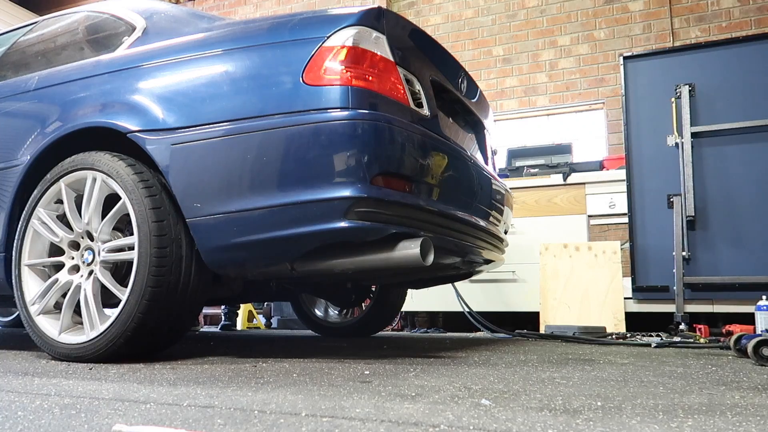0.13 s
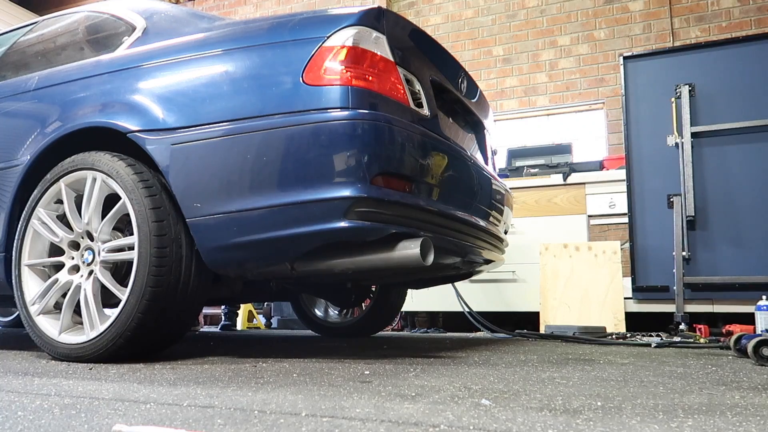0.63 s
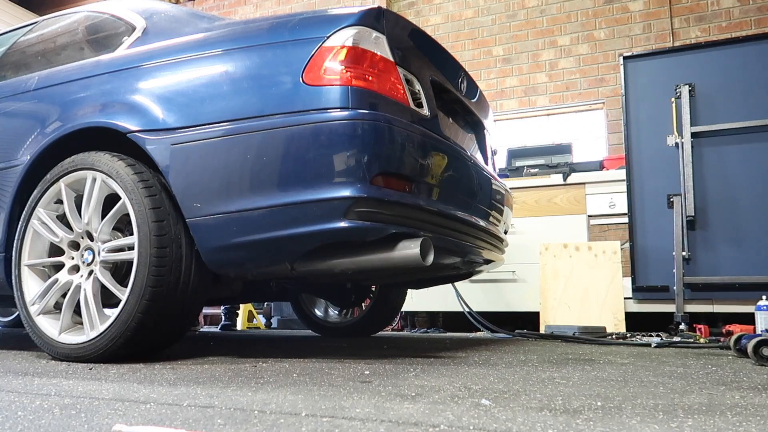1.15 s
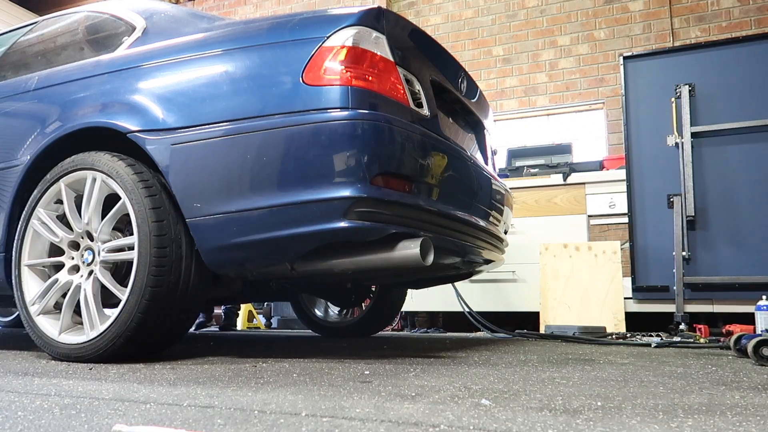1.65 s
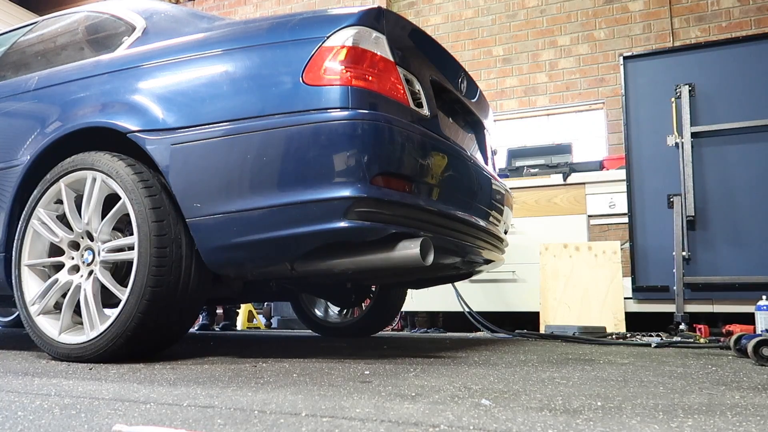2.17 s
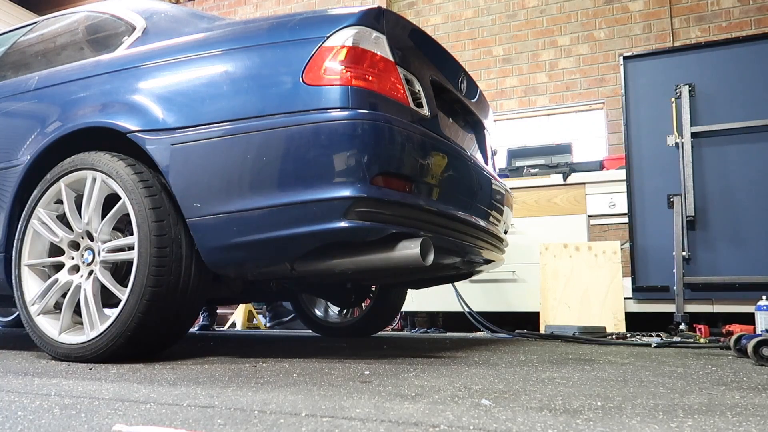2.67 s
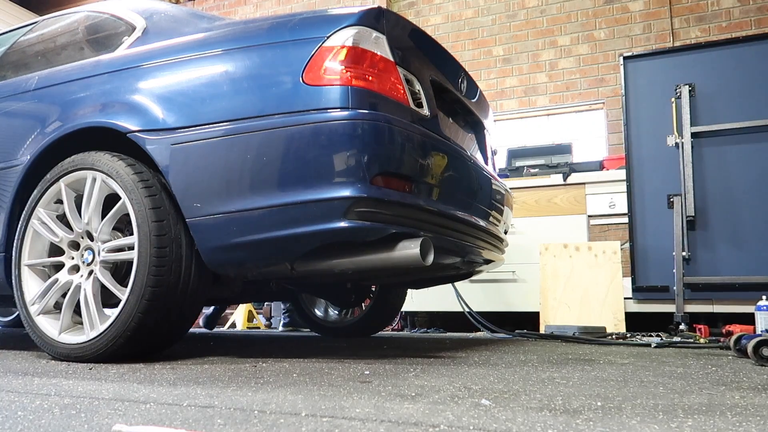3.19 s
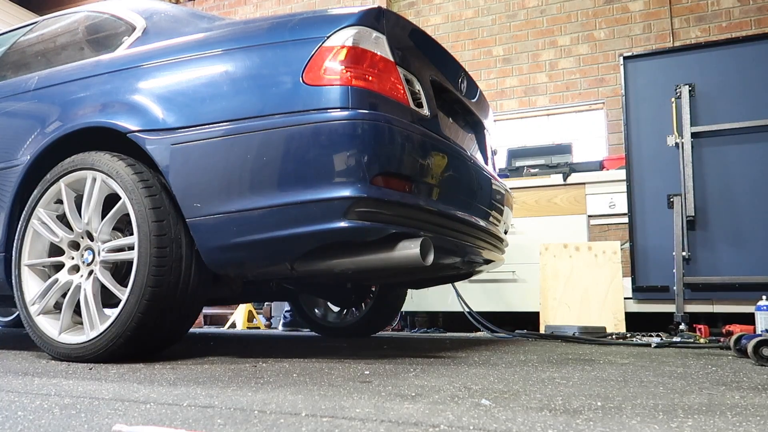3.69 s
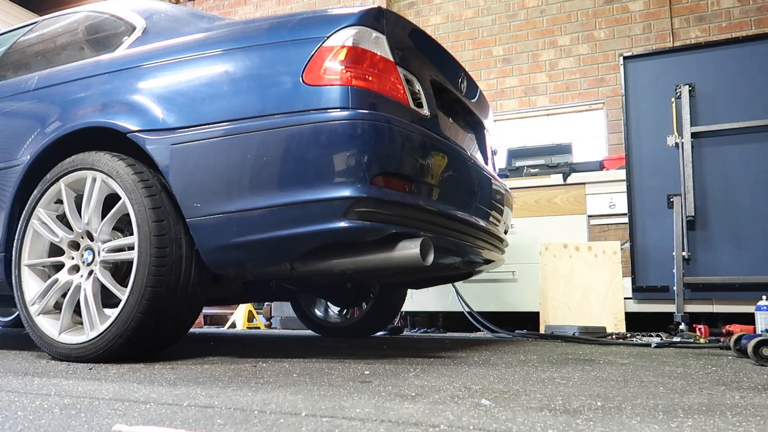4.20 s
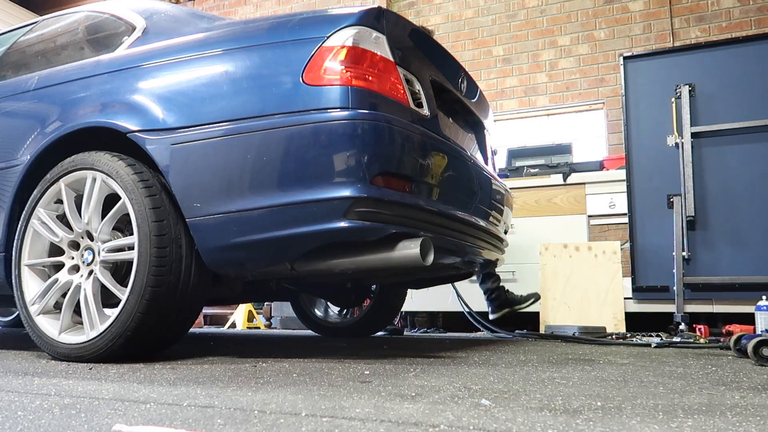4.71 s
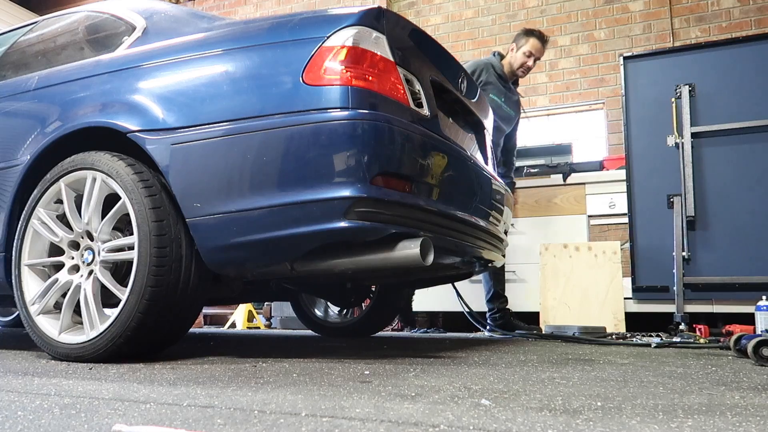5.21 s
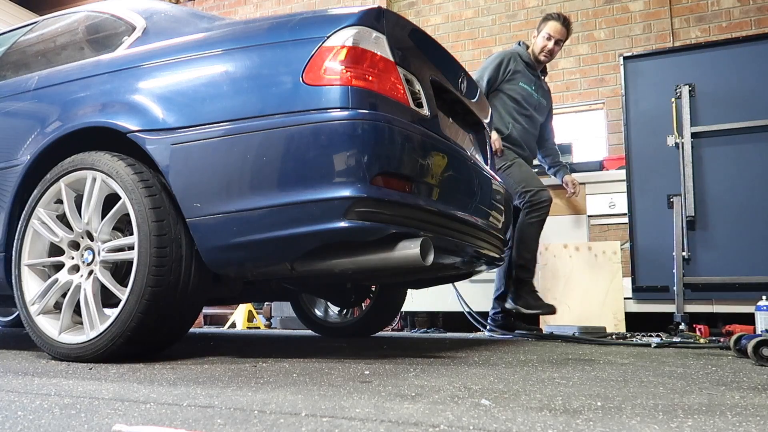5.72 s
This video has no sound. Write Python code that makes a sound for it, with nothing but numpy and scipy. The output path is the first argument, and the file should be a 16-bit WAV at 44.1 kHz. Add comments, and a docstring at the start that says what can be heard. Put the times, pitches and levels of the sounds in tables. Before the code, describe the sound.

Close at the tailpipe, a short metallic cranking whirr breaks into thumping exhaust pulses, a brief rev flare, then a deep, slowing, lumpy idle.

```python
"""The open tailpipe of a six-cylinder engine, near the ground beside a garage: two banks of three pulses and
a crack at each firing ring the modes of a long pipe, first as single thumps, then as a flare sinking to idle.
Before that the starter clacks in and grinds: noise pulsed by gear teeth rings the housing, over mesh tone and hum.
Engine clatter further off is pulsed hiss with valve ticks; the yard behind is coloured noise that soon dips 4 dB."""
import sys
import numpy as np
from scipy import signal
from scipy.fft import rfft, irfft, next_fast_len
from scipy.io import wavfile
from scipy.ndimage import uniform_filter1d

SR = 44100
rng = np.random.default_rng(int(sys.argv[2]) if len(sys.argv) > 2 else 0)


def digitize_waveform(pressure):
    """Quantize a signal to 16-bit integers and store it at the path in sys.argv[1].

    Rows of a 2-D input are taken as channels; values are limited to [-1, 1].
    """
    field = np.atleast_2d(pressure).T
    bounded = np.clip(field, -1, 1)
    quanta = np.round(bounded * 32767).astype(np.int16)
    wavfile.write(sys.argv[1], SR, quanta)


def field_ratio(decibels):
    """Amplitude ratio for a level in dB (20 dB per decade); scalars and array-likes work."""
    return 10 ** (np.asarray(decibels, dtype=float) / 20)


N = 257984

# Speed the engine is steered to. Each row: time in seconds, beats of one three-cylinder bank in Hz.
BANK_SPEED = [(.64, 37.94), (1.3, 35.36), (1.59, 35.84), (1.77, 35.19), (2.24, 31.19), (2.49, 30.88),
              (3.18, 32.57), (3.76, 29.93), (3.9, 29.89), (4.36, 28.73), (4.86, 28.91), (5.3, 28.18),
              (5.51, 27.33), (5.85, 27.11)]
# Engine load. Each row: time in seconds, boom of orders 1-4 in dB, bark of orders 5-8 in dB,
# howl of orders 9-12 in dB, crack of each firing in dB, clatter in dB.
ENGINE_LOAD = [(.65, -56, -18, -24, -10.5, -55), (.76, -20.5, -10.5, -7, -15.5, -47.5),
               (.8, -4, -15.5, -12, -11.5, -40.5), (.95, -5.5, -10.5, -11, -10.5, -40.5),
               (1.3, -7, -19, -11, -9, -42), (1.6, -7.5, -15, -6, -8.5, -40.5),
               (1.9, -1.5, -8.5, -9.5, -6.5, -39), (2.1, -3.5, -6.5, -16.5, -5, -37.5),
               (2.18, -6, -8, -14, -6.5, -41.5), (2.45, 0, -5.5, -5.5, -5, -39.5),
               (2.7, -2.5, -7, -9, -4, -40), (2.95, -1.5, -9, -8.5, -4.5, -40),
               (3.2, -7.5, -9.5, -14.5, -3, -39), (3.5, 0, -6.5, -6, -4, -40), (3.8, -1, -2, -8, -7, -45),
               (4.1, 1.5, -13.5, -5, -14.5, -48), (4.18, 0.5, -11, -20, -11, -48.5),
               (4.6, -0.5, -12, -13, -14.5, -49.5), (5.2, -1.5, -17.5, -16.5, -12.5, -52),
               (5.3, -6, -18, -20, -13, -52), (5.75, -1.5, -12, -9, -9.5, -47)]
# Pressure wave of the two banks. Each row: multiple of the bank beat, relative level in dB.
BANK_ORDERS = [(1, -17), (2, -1.5), (3, 0), (4, 0), (5, -12.5), (6, 5), (7, 4), (8, 9), (9, 1), (10, -1.5),
               (11, 2), (12, -4)]
# Unlike cylinders. Each row: lateness as a share of the firing gap, relative level in dB on the fast idle,
# in dB once settled, in dB on the lowest idle.
CYLINDERS = [(.35, -8, -1, -8), (.5, 4, -4, -10), (.5, -6, -2, 0), (.42, 4, 2, 5), (.45, -3, 0, 1),
             (.35, -8, -2, -8)]
# Times in seconds: fast idle ends, settled idle begins, settled idle ends, lowest idle begins.
BALANCE_S = [3.55, 3.8, 5.05, 5.3]
# Colour of the crack. Each row: frequency in Hz, relative gain in dB.
CRACK_COLOUR = [(40, -59.5), (100, -29), (150, -21.5), (250, -16.5), (320, -16), (450, -22), (600, -34),
                (800, -35), (1100, -61), (3000, -69.5)]
# Low edge of the rasp. Each row: frequency in Hz, gain in dB.
RASP_EDGE = [(580, -15), (680, 1.5)]
# Modes of the pipe and the space under the car. Each row: frequency in Hz, width in Hz, gain in dB.
PIPE_MODES = [(51.1, 5.74, -9), (69.4, 7.3, -12.5), (97.54, 1.9, -16.5), (113.3, 8.57, -8.5),
              (141.8, 12, -22.5), (189.5, 8, -22), (221.84, 6.13, -16), (263.3, 10, -23.5),
              (305.5, 29, -27), (333.35, 8.6, -10.5), (365, 50, -34.5), (437, 10, -16), (453.9, 11.4, -12),
              (505.6, 24, -12.5), (556.2, 14.4, -6), (584, 51, -33.5), (664.4, 5, -14.5), (762.4, 21, -17),
              (882, 56, -17), (967.4, 2.4, 1)]
# First single firings, as the crank picks up. Each row: time in seconds, peak of the push in dB.
PUFFS = [(.586, -12), (0.626, -3.5), (.654, -13), (.681, -4), (0.701, -6), (.724, -4.5), (.741, -5.5),
         (0.759, -4), (0.777, -5.5), (.794, -8.5)]
# Gear mesh of the starter. Each row: time in seconds, mean tooth rate in Hz.
MESH = [(.11, 292.9), (.19, 318.8), (.27, 298.7), (.37, 255.3), (.55, 272.1), (.84, 250.6)]
# Hum of the turning starter. Each row: time in seconds, level in dB.
HUM = [(.11, -50.5), (.15, -25), (.26, -29.5), (.29, -21), (.37, -23), (.55, -32), (.61, -31.5)]
# Ring of starter and bell housing. Each row: frequency in Hz, width in Hz, relative gain in dB.
HOUSING_MODES = [(942, 130, 0.5), (1085, 29, -10.5), (1306, 12, 1), (1480, 14, 3), (1798, 63, 2.5),
                 (2180, 130, 0), (2560, 95, 7), (2850, 89, -2.5), (3113, 140, -2), (3310, 40, -8.5),
                 (4800, 1100, -11)]
# Broad colour of the grind. Each row: frequency in Hz, relative gain in dB.
GRIND_COLOUR = [(100, -15), (184, -10.5), (300, -7.5), (419, -14), (467, -11.5), (550, -13.5), (2180, -9.5),
                (3300, -16.5), (4000, -16.5), (7240, -50), (8500, -57.5), (12000, -99)]
# Upper limit of the treble in the starter's housing and teeth. Each row: frequency in Hz, gain in dB.
TREBLE_LIMIT = [(6500, -4), (8500, -15), (12000, -47)]
# Pinion blows. Each row: time in seconds, relative level in dB, ring in Hz, t60 in seconds.
CLACKS = [(0.071, -7.5, 2632, 0.073), (0.109, -13, 998, 0.043), (0.241, -16.5, 2450, 0.098),
          (0.454, -22, 2485, 0.2), (0.523, -12, 1850, 0.036), (0.586, -8, 1858, 0.071),
          (0.649, -24.5, 2420, 0.042)]
# Low thuds: the solenoid thump first, then the compressions of the cranked engine.
# Each row: start in seconds, level in dB, pitch in Hz, t60 in seconds.
THUDS = [(0.052, -23.5, 152.6, 1), (0.095, -18, 82, 0.4), (0.259, -20, 51.1, 0.32),
         (0.265, -22.5, 81.7, 0.18), (0.406, -21, 46.4, 0.63)]
# Valve ticks in turn, one at every other firing. Each entry: relative level in dB.
TICK_DB = [-54.5, -56, -58.5]
# Colour of the clatter. Each row: frequency in Hz, relative gain in dB.
CLATTER_COLOUR = [(600, -47.5), (950, -4), (1100, -5.5), (1250, -2), (1660, 0), (2330, -4), (2800, -3),
                  (3800, -15), (5150, -20.5), (7240, -29.5), (8500, -36), (12000, -66.5)]
# Background. Each row: frequency in Hz, relative density in dB per Hz.
YARD_COLOUR = [(35, -23), (60, 13.5), (590, -1), (766, -2.5), (1030, -2.5), (2260, -12), (2660, -16),
               (4850, -26), (7240, -35), (9410, -63.5), (15900, -120)]
# Share that reaches the right port two samples after the left. Each row: frequency in Hz, gain in dB.
LAG = [(60, -23.5), (500, -6.5), (1000, -20.5), (2400, -33.5), (4000, 1.5), (6500, 3.5)]
# Reflections that differ between the ports. Each row: frequency in Hz, gain in dB.
APART = [(40, -60), (80, -46.5), (300, -31.5), (1000, -28), (2000, -26.5), (4000, -22)]
# Treble in opposite phase at the ports. Each row: frequency in Hz, relative density in dB per Hz.
WIDE_COLOUR = [(1500, -23), (2800, 9), (3600, 12.5), (4900, 14), (5800, 5.5), (6600, 4), (9000, 6),
               (12000, 4), (14000, -3.5), (15300, -27.5)]

# on catching, the engine is this much slower and closes the gap with this time constant
CATCH_SHORT_HZ, CATCH_S = 20.9, .159
# rasp of the gas above the edge; follows the load less, the speed more
RASP_DB, RASP_DB_PER_CRACK_DB, RASP_DB_PER_HZ, RASP_REF_HZ = -6, 0.19, 1.11, 30.1
PUFF_HALF_WIDTH_S = .0024
POP_S, POP_DB = .714, -21

START_S, BITE_S, THROWN_S = 0.041, 0.069, .61
# the pinion slides in from STIR_DB, then bites fast
STIR_DB, ONSET_DB, GRIND_DB, BITE_RISE_S = -55, -22, -17, 0.0062
SAG_DB_PER_S, FALL_DB_PER_S = -4.5, -170
COAST_END_S, COAST_DB_PER_S = 0.745, -66.5
BRIGHT_DB, BRIGHTEN_DB_PER_S = -9.5, 17.5
LABOUR_S, LABOUR_GAP_S, LABOUR_GRIND_DB, LABOUR_WHINE_DB = 0.15, .165, 1, 3.5
WHINE_DB, SPIN_UP_S, TONE_EDGE_DB_PER_S = -30, .14, 489
HUM_HZ = 227.7
HOUSING_WAVER_DB, HOUSING_WAVER_S = 3.2, .03
CLACK_RING_RISE_S, THUD_RISE_S = .003, .014
SQUEAL_S, SQUEAL_LENGTH_S, SQUEAL_DB, SQUEAL_FROM_HZ, SQUEAL_TO_HZ = .298, .07, -16, 2300, 2010

YARD_DB, WIDE_DB = -34, -19.5


def evened(x):
    """Scales to rms 1."""
    return x / np.sqrt(np.mean(x ** 2) + 1e-20)


def columns(rows):
    """Each column of a curve table at every sample."""
    s, *values = np.transpose(rows)
    return [np.interp(np.arange(N) / SR, s, v) for v in values]


def shape(x, points=None, modes=None):
    """Filters by a spectrum and by a sum of resonances."""
    size = next_fast_len(N + SR)
    hz, z = np.fft.rfftfreq(size, 1 / SR), rfft(x, size)
    if points:
        f, db = np.transpose(points)
        z = z * field_ratio(np.interp(np.log(hz + 1), np.log(f + 1), db))
    if modes:
        # neighbouring modes cancel between their peaks and leave dark valleys
        z = z * sum(field_ratio(db) * 1j * hz * w / (f ** 2 - hz ** 2 + 1j * hz * w) for f, w, db in modes)
    return irfft(z, size)[:N]


def drift(seconds):
    """Slow chance of rms 1."""
    size = round(seconds * SR)
    return evened(uniform_filter1d(uniform_filter1d(rng.standard_normal(N), size), size))


def ring(s, db, hz, t60, rise):
    """One dying mode that starts at s."""
    start, out = round(s * SR), np.zeros(N)
    t = np.arange(min(round(1.5 * t60 * SR), N - start)) / SR
    decay = field_ratio(db - 60 * t / t60)
    out[start:start + len(t)] = decay * (1 - np.exp(-t / rise)) * np.sin(2 * np.pi * hz * t)
    return out


def smear(x, seconds, span_hz):
    """Reflections from ground and walls: chance delays, one per span_hz, blended between."""
    size = next_fast_len(N + SR)
    hz = np.fft.rfftfreq(size, 1 / SR)
    knots = np.arange(0, SR / 2 + span_hz, span_hz)
    delay = np.interp(hz, knots, seconds * rng.random(len(knots)))
    # phase is the running sum of delay over frequency
    return irfft(rfft(x, size) * np.exp(-2j * np.pi * np.cumsum(delay) * hz[1]), size)[:N]


def speed():
    """Bank beats in Hz: the engine flares up to its steered speed and follows it."""
    since = np.arange(N) / SR - BANK_SPEED[0][0]
    return columns(BANK_SPEED)[0] - CATCH_SHORT_HZ * np.exp(-np.maximum(since, 0) / CATCH_S)


def firings():
    """Count of firings so far, six to an engine cycle."""
    running = np.arange(N) >= BANK_SPEED[0][0] * SR
    return np.cumsum(2 * speed() * running) / SR + .3


def exhaust(count, waver_db=.6):
    """The banks' pressure wave and a sharp crack at each firing pass the pipe."""
    *orders_db, crack_db, _ = columns(ENGINE_LOAD)
    wave = 0
    for k, db in BANK_ORDERS:
        group_db = orders_db[(int(k) - 1) // 4]
        wave = wave + field_ratio(db + group_db + waver_db * drift(0.047)) * np.cos(np.pi * k * count)
    cracks = shape(gas(firing_clicks(count), crack_db) * field_ratio(8.5), CRACK_COLOUR)
    running = np.arange(N) > ENGINE_LOAD[0][0] * SR
    return shape(running * (np.sqrt(2) * wave + cracks), modes=PIPE_MODES)


def firing_clicks(count, jitter_gaps=.008, uneven_db=.8):
    """One click a firing, each cylinder with its own lateness and a balance that shifts with the idle."""
    number = np.arange(1, int(count[-1]))
    late, fast_db, settled_db, low_db = np.array(CYLINDERS)[number % len(CYLINDERS)].T
    when_s = np.interp(number, count, np.arange(N) / SR)
    settled = np.interp(when_s, BALANCE_S[:2], [0, 1])
    lowest = np.interp(when_s, BALANCE_S[2:], [0, 1])
    db = fast_db + (settled_db - fast_db) * settled + (low_db - settled_db) * lowest
    chance = rng.standard_normal((len(number), 2))
    # the valve opens .4 of a gap before the sound has spread out
    at = np.interp(number + late - .4 + jitter_gaps * chance[:, 0], count, np.arange(N)).astype(int)
    clicks = np.zeros(N)
    clicks[at] = field_ratio(db + uneven_db * chance[:, 1])
    # one click a cycle carries this height so that each order has rms 1
    clicks *= SR / (speed() / 3) / np.sqrt(2 * len(CYLINDERS))
    return smear(clicks, .007, 50)


def gas(cracks, crack_db):
    """Turbulent roar swells with stronger cylinders; above the edge, rough rasp with a weaker beat of firings."""
    power = uniform_filter1d(uniform_filter1d(cracks ** 2, 500), 500)
    flow = evened(np.sqrt(abs(power)))
    roar = np.std(cracks) * shape(rng.standard_normal(N), [(250, -5), (400, 0)])
    rasp = shape(0.51 * cracks + roar * field_ratio(1.3 * drift(0.034)), RASP_EDGE)
    rasp_db = RASP_DB + RASP_DB_PER_CRACK_DB * crack_db + RASP_DB_PER_HZ * (speed() - RASP_REF_HZ)
    low = cracks + .24 * evened(.6 + flow) * roar
    low = low - shape(low, RASP_EDGE)
    return low * field_ratio(crack_db) + rasp * field_ratio(rasp_db)


def puffs():
    """Each push of pressure lies between two dips and rings the pipe; one late-burning charge barks."""
    push = np.zeros(N)
    for s, db in PUFFS:
        u = (np.arange(N) / SR - s) / PUFF_HALF_WIDTH_S
        push += field_ratio(db) * (1 - u ** 2) * np.exp(-u ** 2 / 2)
    # the bark rings the upper pipe modes
    pop = sum(ring(POP_S, POP_DB, hz, 0.15, 0.002) for hz, _, _ in PIPE_MODES if 400 < hz < 600)
    return push + field_ratio(-9) * shape(push, modes=PIPE_MODES) + pop


def starter():
    """Gear grind, mesh tone, hum, pinion blows, thuds and squeal; returns the sound and its treble level."""
    (grind_db, whine_db, bright_db), mesh_hz = cranking(), columns(MESH)[0]
    t = np.arange(N) / SR
    hum_db = columns(HUM)[0] + FALL_DB_PER_S * np.maximum(t - HUM[-1][0], 0)
    on = t > START_S
    turns = np.cumsum(mesh_hz * (1 + .016 * drift(.004))) / SR
    whine = field_ratio(whine_db) * np.sin(2 * np.pi * turns)
    hum = field_ratio(hum_db) * np.sin(2 * np.pi * HUM_HZ * t + 0.58 * drift(0.041))
    blows, clacks = pinion_blows()
    thuds = sum(ring(*row, THUD_RISE_S) for row in THUDS)
    level = on * field_ratio(grind_db + .8 * bright_db) + .2 * blows
    turning = on * (field_ratio(grind_db) * gear_grind(turns, bright_db) + np.sqrt(2) * (whine + hum))
    return turning + clacks + thuds + squeal(), level


def cranking():
    """Grind, mesh tone and brightness in dB: each compression labours the motor, the freed pinion coasts."""
    t = np.arange(N) / SR
    labour = np.cos(2 * np.pi * (t - LABOUR_S) / LABOUR_GAP_S) * (t < THROWN_S)
    turning, after = np.clip(t, BITE_S, THROWN_S) - BITE_S, np.maximum(t - THROWN_S, 0)
    grind_db = np.interp(t, [START_S, BITE_S - BITE_RISE_S, BITE_S], [STIR_DB, ONSET_DB, GRIND_DB])
    grind_db += SAG_DB_PER_S * turning + COAST_DB_PER_S * after
    grind_db += FALL_DB_PER_S * np.maximum(t - COAST_END_S, 0)
    # the mesh tone sounds from spin-up until the pinion leaves
    whine_db = WHINE_DB - TONE_EDGE_DB_PER_S * (np.maximum(SPIN_UP_S - t, 0) + after)
    whine_db += LABOUR_WHINE_DB * labour
    # treble grows as the crank speeds up
    return grind_db + LABOUR_GRIND_DB * labour, whine_db, BRIGHT_DB + BRIGHTEN_DB_PER_S * turning


def gear_grind(turns, bright_db):
    """Noise pulsed by each tooth, with mesh overtones, rings the housing."""
    teeth = (.5 + np.exp(-(turns % 1) / .3)) * field_ratio(2 * drift(.01)) * rng.standard_normal(N)
    # overtones slide with the load on the motor
    overtones = sum(field_ratio(6 * drift(.018)) * np.cos(2 * np.pi * k * turns) for k in range(2, 13))
    teeth += .08 * (np.arange(N) < THROWN_S * SR) * overtones
    # each mode's level wavers on its own by a few dB
    housing = sum(field_ratio(HOUSING_WAVER_DB * drift(HOUSING_WAVER_S)) * shape(teeth, TREBLE_LIMIT, [mode])
                  for mode in HOUSING_MODES)
    grind = evened(evened(housing) + 1.4 * evened(shape(teeth, GRIND_COLOUR)))
    high = shape(grind, [(1500, -34.5), (2500, -2.5)])
    return grind - high + high * field_ratio(bright_db)


def pinion_blows():
    """Bursts of housing noise with three close rings each; returns burst envelope and sound."""
    blows, rings = np.zeros((2, N))
    for s, db, hz, t60 in CLACKS:
        t = np.arange(N) / SR - s
        blows += field_ratio(db) * np.clip(t / .0015, 0, 1) * np.exp(-np.maximum(t, 0) / 0.0022)
        rings += sum(ring(s, db - 3.5, hz * ratio, t60, CLACK_RING_RISE_S) for ratio in (.955, 1, 1.03))
    noise = evened(shape(rng.standard_normal(N), TREBLE_LIMIT, HOUSING_MODES))
    knock = 0.87 * shape(blows * noise, [(3500, 7.5), (8000, -7.5)])
    return blows, knock + rings


def squeal():
    """Teeth squeal as the motor bogs down: a rough tone and its upper partner slide down."""
    u = np.clip((np.arange(N) / SR - SQUEAL_S) / SQUEAL_LENGTH_S, 0, 1)
    slide_hz = SQUEAL_FROM_HZ + (SQUEAL_TO_HZ - SQUEAL_FROM_HZ) * u
    turns = np.cumsum(slide_hz * (1 + .012 * drift(.003))) / SR
    tone = np.sin(2 * np.pi * turns) + field_ratio(-4.5) * np.sin(2 * np.pi * 1.5 * turns)
    return field_ratio(SQUEAL_DB + 2 * drift(.004)) * np.sin(np.pi * u) ** 2 * tone


def clatter(count):
    """Hiss pulsed by each firing and the valve ticks; returns the sound and its treble level."""
    running = np.clip((np.arange(N) / SR - ENGINE_LOAD[0][0]) / .08, 0, 1)
    level = field_ratio(columns(ENGINE_LOAD)[-1] + 0.65 * drift(0.03) + 0.55 * drift(0.012)) * running
    gate = evened(1.3 + np.exp(-(count % 1) / 0.77))
    hiss = evened(shape(gate * rng.standard_normal(N), CLATTER_COLOUR))
    pairs = np.maximum(count - .15, 0) / 2
    number = pairs.astype(int)
    chance_db = 1.8 * rng.standard_normal(number[-1] + 1)[number]
    size = field_ratio(np.array(TICK_DB)[number % len(TICK_DB)] + chance_db)
    tick = np.exp(-(pairs % 1) / .06) * field_ratio(1.5 * drift(.03)) * rng.standard_normal(N)
    tick = shape(size * evened(tick), [(3500, 13.0), (6000, 0.0)], [(2930, 450, 0)])
    return level * hiss + tick * running, level * gate


def yard():
    """Quiet coloured noise; its level dips by 4 dB just after the start and stays there."""
    level_db = columns([(.05, -4.5), (.09, -8.5)])[0]
    return field_ratio(YARD_DB + level_db) * evened(shape(rng.standard_normal(N), YARD_COLOUR))


def scene():
    """All sources in the middle, plus a side signal added at the left port and subtracted at the right."""
    count = firings()
    (grind, grind_level), (rattle, rattle_level) = starter(), clatter(count)
    mid = exhaust(count) + puffs() + grind + rattle + yard()
    side = shape(np.gradient(mid), LAG)
    # the engine sits a little left
    side += shape(mid, [(500, -69.5), (1200, -25.5), (2500, -26.5), (5000, -15.5), (8000, -30.5)])
    side += shape(smear(mid, .02, 60), APART)
    treble = evened(shape(rng.standard_normal(N), WIDE_COLOUR))
    side += field_ratio(WIDE_DB) * (field_ratio(5.5) * grind_level + rattle_level + field_ratio(-57.5)) * treble
    return np.array([mid + side, mid - side])


def low_pass(x):
    """Removes everything above the highest recorded frequency."""
    return signal.sosfilt(signal.butter(12, 15100, fs=SR, output="sos"), x)


def record(dry):
    """Microphone low cut and soft overload."""
    cut = signal.lfilter(*signal.butter(3, 38, "high", fs=SR), dry)
    knee = 1.6
    return low_pass(knee * np.tanh(cut / knee))


dry = scene()
out = record(dry)
digitize_waveform(out)
```